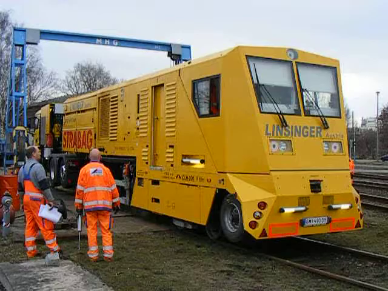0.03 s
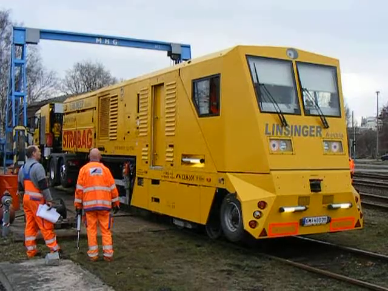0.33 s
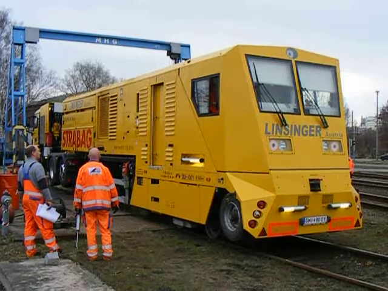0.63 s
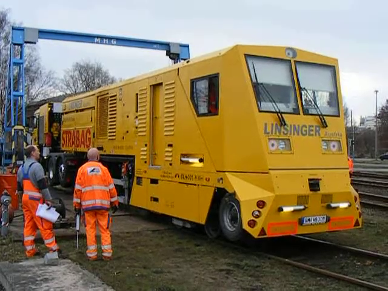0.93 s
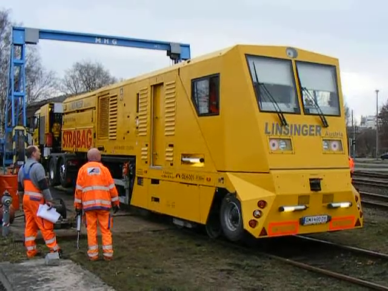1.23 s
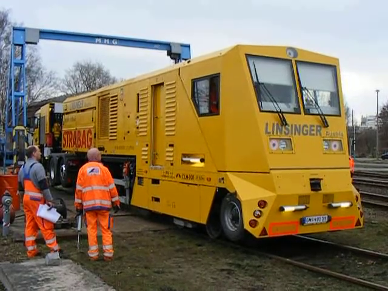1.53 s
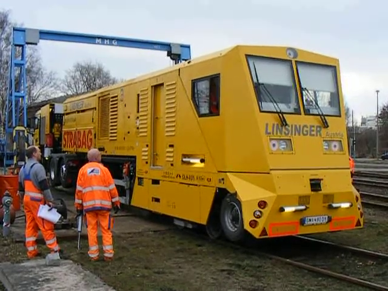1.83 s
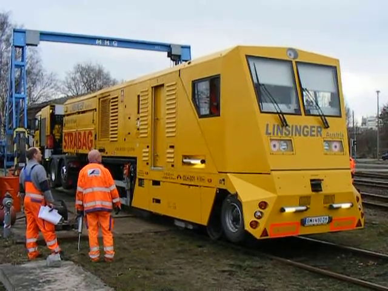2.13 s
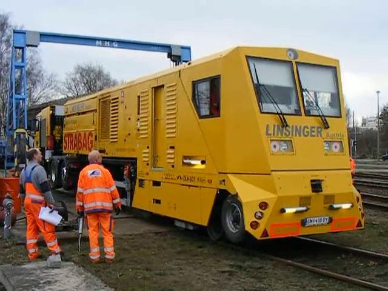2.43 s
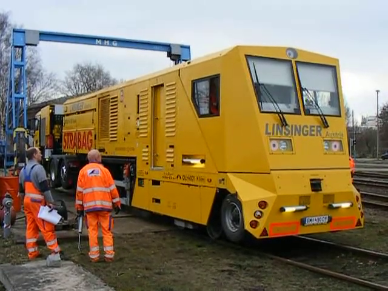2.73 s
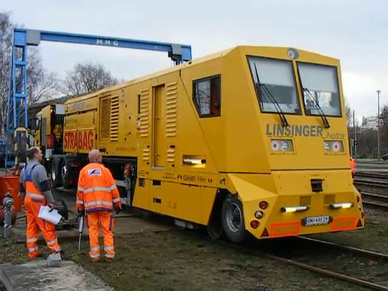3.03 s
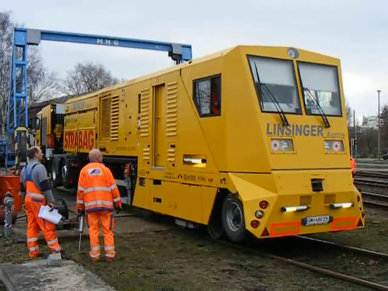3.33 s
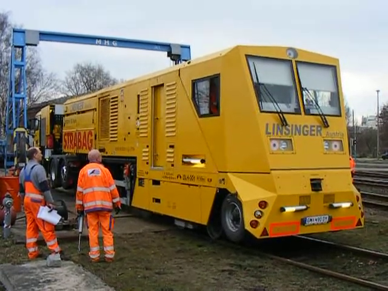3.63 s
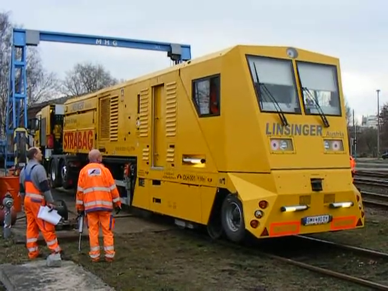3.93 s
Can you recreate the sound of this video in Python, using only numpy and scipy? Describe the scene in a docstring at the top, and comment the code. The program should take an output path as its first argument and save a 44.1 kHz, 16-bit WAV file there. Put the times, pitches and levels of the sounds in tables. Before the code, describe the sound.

A large diesel engine on a rail maintenance machine drones and clatters at constant speed in an open yard. A hydraulic pump buzzes brightly above it, with low hum, faint gear whine and rushing air, heard through one handheld microphone.

```python
"""A rail milling machine in an open yard, heard through one handheld microphone.
At 0.07 s everything cuts in at once: the six-cylinder diesel, held at 1800 rpm, drones through its
exhaust and clatters once per firing; a hydraulic pump buzzes brightly above it, a generator and a slow
fan hum below, gears whine and cooling air rushes through the louvres. The treble dips at 1.2 s; from
1.5 to 2.2 s a slight move of the microphone recolours the pump's buzz; the treble dips again at 2.9 s."""
import sys
import numpy as np
from scipy import signal
from scipy.fft import rfft, irfft
from scipy.io import wavfile

SR = 44100
rng = np.random.default_rng(int(sys.argv[2]) if len(sys.argv) > 2 else 0)


def file_out(sig):
    """Save sig as 16-bit WAV at sys.argv[1]."""
    # one column per channel
    cols = np.atleast_2d(sig).T
    # limit, then scale
    lim = np.clip(cols, -1, 1)
    pcm = np.round(lim * 32767).astype(np.int16)
    wavfile.write(sys.argv[1], SR, pcm)


N = 176400
CYCLE_HZ, CYLINDERS = 15.008, 6   # one four-stroke cycle is two turns of the crankshaft


def from_db(db):
    """Decibels to gain."""
    return 10 ** (np.asarray(db) / 20)


def spectrum_db(points, hz):
    """Read a spectrum on a log-frequency axis."""
    points_hz, db = np.transpose(points)
    return np.interp(np.log(np.maximum(hz, 1)), np.log(points_hz), db)


def drift(rate_hz):
    """Slow random movement with spread 1."""
    pole = np.exp(-200 * np.pi * rate_hz / SR)
    noise = rng.standard_normal(N // 100 + 2002)   # one value per 100 samples
    slow = signal.lfilter([1], [1, -2 * pole, pole * pole], noise)[2000:]
    return np.interp(np.arange(N) / 100, np.arange(len(slow)), slow / slow.std())


def tone(turns, db, flicker_db):
    """A sine around the given rms level, wavering in the open air on its way to the microphone."""
    return np.sqrt(2) * from_db(db + flicker_db * drift(3.5)) * np.cos(2 * np.pi * turns)


# Each cylinder's knock, in firing order: relative_db
CYLINDER_KNOCKS = [0.5, 4, 0.5, 3, -0.5, -6]

def knock_phases(decay_s=.008, size=8192):
    """Phases (turns) of the harmonics of one cycle of six evenly spaced knocks of uneven strength."""
    cylinder, since_firing = np.divmod(np.arange(size) / size * CYLINDERS, 1)
    since_s = since_firing / (CYLINDERS * CYCLE_HZ)
    envelope = from_db(CYLINDER_KNOCKS)[cylinder.astype(int)] * np.exp(-since_s / decay_s)
    return np.angle(rfft(rng.standard_normal(size) * envelope)) / (2 * np.pi)


# The diesel's strong lines: cycle_multiple, level_db
DIESEL_LINES = [(6, -26.5), (7, -41), (9, -43), (10, -31.5), (11, -36), (12, -24), (13, -38), (14, -36.5),
                (16, -36), (17, -34.5), (22, -39), (26, -46), (38, -42), (47, -44), (48, -36.5), (54, -38),
                (55, -43), (60, -35), (62, -42.5), (64, -43), (69, -43.5), (70, -36), (75, -44), (90, -41),
                (102, -40.5)]

def engine(shaft_s, exhaust_below_hz=600):
    """The firings make the block clatter; the silencer smears the low lines into a smooth drone."""
    phases = knock_phases()
    in_exhaust = np.arange(len(phases)) * CYCLE_HZ < exhaust_below_hz
    phases += rng.random(len(phases)) * in_exhaust
    drone = sum(tone(k * CYCLE_HZ * shaft_s + phases[k], db, flicker_db=.5) for k, db in DIESEL_LINES)
    return drone + clatter(shaft_s, phases)


# Outline of the engine block's weaker lines: frequency_hz, line_level_db
BLOCK_SPECTRUM = [(30, -68.5), (100, -53), (220, -44.5), (400, -48), (460, -51.5), (560, -46), (660, -48),
                  (820, -46), (1020, -49.5), (1200, -48), (1700, -55.5), (2600, -60.5), (4000, -77)]

def clatter(shaft_s, phases, spread_db=.85, flicker_db=1.63):
    """The block rattles under the knocks, repeating every cycle with changing strength."""
    hz = np.arange(len(phases)) * CYCLE_HZ
    gain = from_db(spectrum_db(BLOCK_SPECTRUM, hz) + spread_db * rng.standard_normal(len(hz)))
    gain *= (hz > 0) & (hz < BLOCK_SPECTRUM[-1][0])
    gain[[k for k, _ in DIESEL_LINES]] = 0   # these sound in the drone
    cycle = irfft(gain * np.exp(2j * np.pi * phases), norm="forward") / np.sqrt(2)
    rattle = np.interp(CYCLE_HZ * shaft_s % 1, np.arange(len(cycle)) / len(cycle), cycle)
    return rattle * from_db(flicker_db * drift(25))


# The pump's partials as the microphone moves: piston_rate_multiple, mid_move_level_db, change_db
PUMP_PARTIALS = [(1, -21, 0.1), (2, -21, -0.1), (3, -42.5, 0), (4, -37, 1), (5, -33.5, -1.5),
                 (6, -31.5, -3), (7, -31.5, -.5), (8, -39, -3), (9, -35, 3), (10, -39, -1.5), (11, -40, 0),
                 (12, -50.5, 0.5), (13, -56, 0), (14, -53, -1)]
PUMP_HZ = 265.05

def pump(shaft_s, mid_move_s=1.85, move_takes_s=.68):
    """Piston pressure ripple, smeared by the housing: two firm low partials and a wavering buzz above."""
    # moving through the interference pattern, the microphone gains some partials and loses others
    moved = np.clip((shaft_s - mid_move_s) / move_takes_s, -.5, .5)
    partials = []
    for k, db, change_db in PUMP_PARTIALS:
        turns = k * PUMP_HZ * shaft_s + rng.random()
        partials.append(tone(turns, db + change_db * moved, flicker_db=.4 if k <= 2 else 1.02))
    return sum(partials[:2]) + sum(partials[2:]) * treble_swing(shaft_s)


# Generator hum and fan hum: shaft_multiple, level_db
GENERATOR_LINES = [(1, -33.5), (2, -36), (4, -36), (7, -40.5), (8, -41)]
FAN_LINES = [(1, -34.5), (2, -44), (4, -53.5)]

def generator_and_fan(shaft_s, generator_hz=50.03, fan_hz=38.3):
    """Two shafts at different speeds hum and beat against each other."""
    return sum(tone(k * hz * shaft_s + rng.random(), db, flicker_db=2.5)
               for hz, lines in ((generator_hz, GENERATOR_LINES), (fan_hz, FAN_LINES))
               for k, db in lines)


# Thin gear tones: pitch_hz, relative_db
GEAR_WHINES = [(3063, -42), (3182, -49), (3332, -46), (3709, -53.5), (4054, -61), (4290, -55)]

def gears(shaft_s, gain_db=-3.2):
    """Meshing gears whine faintly across the yard."""
    return sum(tone(hz * shaft_s, db + gain_db, flicker_db=1.4) for hz, db in GEAR_WHINES)


# Cooling air and combustion roar at the microphone: frequency_hz, density_db_per_hz
AIR_SPECTRUM = [(15, -76), (35, -63.5), (75, -55.5), (130, -53.5), (190, -54), (250, -54), (310, -58.5),
                (400, -58), (465, -65.5), (540, -54), (670, -59.5), (850, -56), (1100, -58), (1450, -66.5),
                (1650, -59), (2100, -62), (2300, -64), (2900, -65), (3550, -69.5), (4000, -76),
                (4400, -80.5), (4900, -87.5), (5900, -102)]

def air(shaft_s, pump_depth=.091, firing_depth=.094):
    """Air rushes through the louvres, pulsed lightly by the pump and the firings."""
    pump_pulse = pump_depth * np.cos(2 * np.pi * PUMP_HZ * shaft_s)
    firing_pulse = firing_depth * np.cos(2 * np.pi * CYLINDERS * CYCLE_HZ * shaft_s)
    rush = rng.standard_normal(N) * (1 + pump_pulse + firing_pulse) * treble_swing(shaft_s)
    colour = from_db(spectrum_db(AIR_SPECTRUM, np.fft.rfftfreq(N, 1 / SR)))
    return irfft(rfft(rush) * colour, N) * np.sqrt(SR / 2)


# Swells and dips of the pump's buzz and the air: time_s, relative_db
TREBLE_CONTOUR = [(0.1, -22.5), (0.84, -24), (1.19, -22.5), (1.21, -28.5), (1.27, -23.5), (1.93, -23),
                  (2.33, -25), (2.6, -23), (2.66, -21.5), (2.77, -25), (2.89, -22.5), (2.91, -26),
                  (3.03, -23), (3.44, -23.5), (3.48, -23.5), (3.98, -23.5)]

def treble_swing(shaft_s, share=.9):
    """Gain that lets buzz and air swell and sink by a share of the contour's swing about its mean."""
    db = np.interp(shaft_s, *np.transpose(TREBLE_CONTOUR))
    return from_db(share * (db - db.mean()))


def scene():
    """The machine in the yard: everything turns with the crankshaft, whose governor hunts slightly."""
    speed = 1 + .0003 * drift(rate_hz=.576)
    shaft_s = np.cumsum(speed) / SR
    machine = engine(shaft_s) + pump(shaft_s) + generator_and_fan(shaft_s) + gears(shaft_s)
    return (machine + air(shaft_s))[None]


def record(dry):
    """The sound at the microphone cuts in abruptly, and the top of the treble is cut off."""
    start_s, cut_in_s, stopband_hz = .072, .0005, 6550
    opened = np.clip((np.arange(N) / SR - start_s) / cut_in_s, 0, 1)
    lowpass = signal.cheby2(16, 70, stopband_hz, fs=SR, output="sos")
    return signal.sosfilt(lowpass, dry * opened + 1e-18)


dry = scene()
out = record(dry)
file_out(out)
```